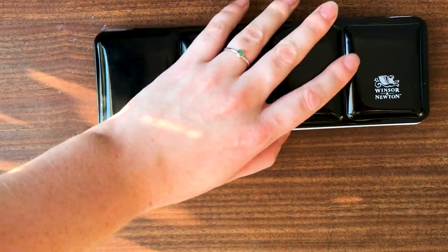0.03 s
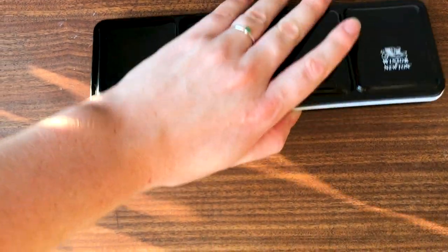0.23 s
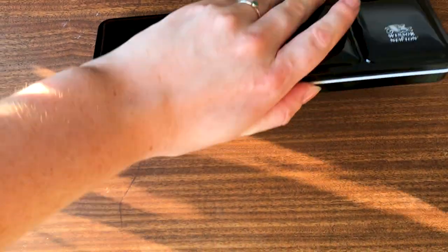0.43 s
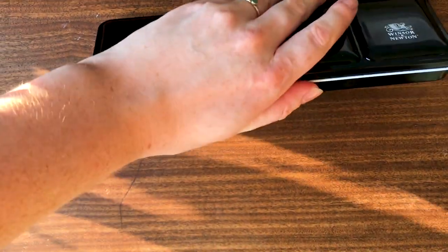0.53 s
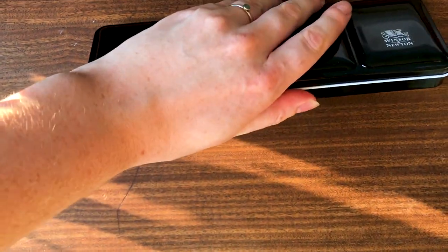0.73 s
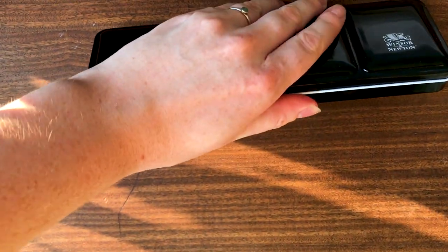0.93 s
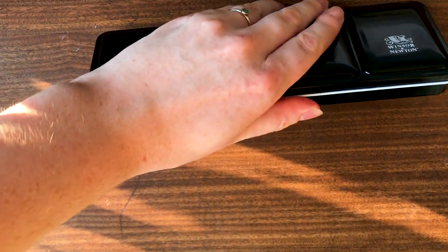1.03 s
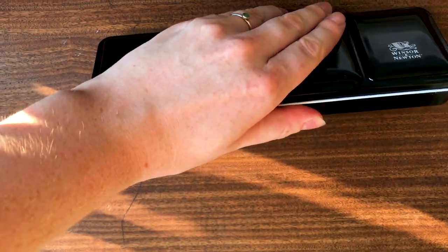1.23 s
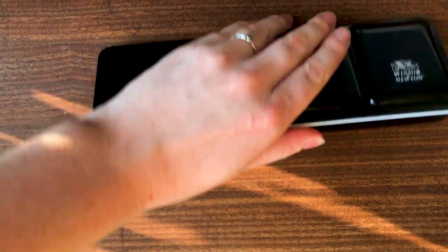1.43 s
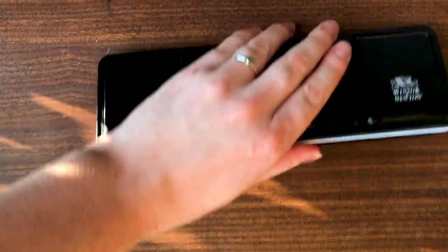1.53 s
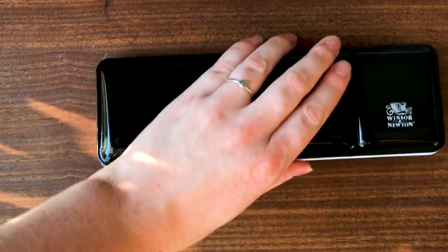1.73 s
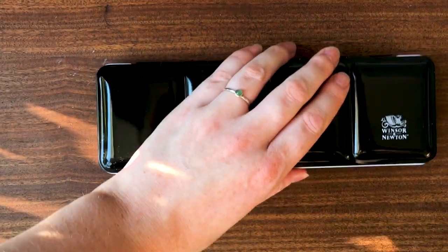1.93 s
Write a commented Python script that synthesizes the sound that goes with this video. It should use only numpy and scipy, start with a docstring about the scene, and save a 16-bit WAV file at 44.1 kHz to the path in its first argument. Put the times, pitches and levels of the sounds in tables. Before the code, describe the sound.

Close microphone in a small quiet room: a thin metal tin is knocked and dragged on wood, with dry clacks early, a short judder, near silence, one bright snap and soft fumbling knocks over low hum.

```python
"""A short scrape and light knocks come first: fingers work a flat metal tin open on a wooden table.
Blows excite the tin's damped modes and a noisy clatter; dense grit drags the same body over the wood,
and single slips make it judder. Random reflections give the quiet room around it.
Under it lie filtered-noise rumble and microphone hiss, a wavering hum and faint regular treble ticks."""
import sys
import numpy as np
from scipy import signal
from scipy.fft import rfft, irfft
from scipy.io import wavfile
from scipy.ndimage import uniform_filter1d

SR = 44100
rng = np.random.default_rng(int(sys.argv[2]) if len(sys.argv) > 2 else 0)


def gain_from_db(level_db):
    """Turn a decibel level (scalar or array-like) into a linear amplitude factor."""
    decades = np.asarray(level_db, float) / 20
    return 10 ** decades


def log_audio(samples):
    """Write samples as a 16-bit WAV file to the path given in sys.argv[1]."""
    # one column per channel
    frames = np.atleast_2d(samples).T
    # limit to full scale, then quantise
    limited = np.clip(frames, -1, 1)
    pcm = np.round(limited * 32767).astype(np.int16)
    wavfile.write(sys.argv[1], SR, pcm)


N = 88200

# modes of the hand-held tin and the table under it, before grip, contact place and decay limits:
# mode_hz [Hz], level_db [dB], t60_s [s]
TIN_MODES = [(329.2, 9.5, 0.033), (520, 6, 0.0076), (680, -5, 0.019), (736, -7, 0.069), (880, 4, 0.035),
             (1155, 17.5, 0.009), (1405, 5, 0.029), (1800, 10, 0.0058), (2166, 12.5, 0.012),
             (2594, 14, 0.0084), (2766, -3.5, 0.02), (3510, -3.5, 0.039), (3820, 3.5, 0.016),
             (4250, 6, 0.013), (4760, 1, 0.0098), (5330, -13, 0.01), (6610, 6.5, 0.0091), (7040, 0, 0.0098),
             (9280, -3, 0.0083)]


def read(points, hz):
    """Value of a spectrum table, straight on a log-frequency axis."""
    point_hz, value = np.transpose(points)
    return np.interp(np.log(hz + 1), np.log(point_hz + 1), value)


def evened(x):
    """Scales to rms 1."""
    return x / np.sqrt(np.mean(x ** 2) + 1e-20)


def add(mix, start_s, sound):
    """Mixes a sound in at its start time."""
    part = mix[round(start_s * SR):][:len(sound)]
    part += sound[:len(part)]


def random_places():
    """Each contact lands elsewhere on the tin, so each mode gets its own random drive."""
    return rng.standard_normal((len(TIN_MODES), 1))


def contact(best_hz, fall_db):
    """Causal (minimum-phase) colour of a contact: strongest near best_hz, falling off on both sides."""
    fall_below_db = 5  # dB per octave, as are knock_fall_db and top_fall_db
    knock_low_hz, knock_fall_db = 250, 24
    top_hz, top_fall_db = 9500, 11
    hz = np.maximum(abs(np.fft.fftfreq(2048, 1 / SR)), 20)
    octaves = np.log2(hz / best_hz)
    db = -np.where(octaves > 0, max(fall_db, 0), -fall_below_db) * octaves
    db = db - knock_fall_db * np.maximum(np.log2(knock_low_hz / hz), 0)
    db = db - top_fall_db * np.maximum(np.log2(hz / top_hz), 0)
    log_gain = np.maximum(db, -100) * np.log(10) / 20
    spectrum = np.exp(np.conj(signal.hilbert(log_gain)))
    return np.fft.ifft(spectrum).real[:1024]


def ring(clicks, best_hz, fall_db, place, grip):
    """The tin's answer to clicks: damped modes and fresh dense clatter, coloured by the contact."""
    focus_db, focus_octaves, focus_ring = 6, 0.11, 0.7  # boost, reach, share of longer ringing
    place_db = 2.2  # spread of mode levels from contact to contact
    clatter_db, clatter_t60_s = 13, 0.013  # dense small modes blur into a dying noise
    hz, db, t60 = np.transpose(TIN_MODES)[:, :, None]
    t = np.arange(4096) / SR

    # the grip bends the nearest mode towards best_hz and lets it ring most
    near = grip * np.exp(-(np.log2(hz / best_hz) / focus_octaves) ** 2)
    hz = hz + near * (best_hz - hz)
    db = db + focus_db * near
    t60 = np.clip(t60 * (1 + focus_ring * near), 0.01, 0.12)

    decay = gain_from_db(db + place_db * place - 60 * t / t60)
    modes = (decay * np.sin(2 * np.pi * hz * t)).sum(0)
    power = signal.fftconvolve(clicks ** 2, gain_from_db(clatter_db - 60 * t / clatter_t60_s) ** 2)
    clatter = np.sqrt(abs(power)) * rng.choice([-1., 1.], len(power))
    body = signal.fftconvolve(clicks, modes) + clatter
    return signal.fftconvolve(body, contact(best_hz, fall_db))


def slide():
    """Dense uneven grit clicks into the tin's body as it drags over the wood."""
    # movement of the drag: time_s [s], level_db [dB]
    drag = [(0, -31), (.06, -60.5), (.1, -49.5), (.165, -47), (.2, -65), (.4, -37), (.44, -76), (.47, -51),
            (0.512, -39.5), (.6, -45), (.625, -48), (.74, -52), (.8, -58), (1.2, -56.5), (1.4, -59.5),
            (1.52, -49), (1.65, -56.5), (1.721, -41.5), (1.768, -44), (1.83, -54), (1.95, -47.5), (2, -55)]
    best_hz, fall_db = 463, 6.5  # fall in dB per octave
    grit_per_s, grit_db = 2500, 2.5
    size = gain_from_db(grit_db * np.minimum(rng.exponential(1, N), 4))
    sign = rng.choice([-1., 1.], N)
    hit = rng.random(N) < grit_per_s / SR
    body = ring(size * sign * hit, best_hz, fall_db, 0, 0)[:N]
    time_s, level_db = np.transpose(drag)
    return evened(body) * gain_from_db(np.interp(np.arange(N) / SR, time_s, level_db))


def room(x):
    """Sparse reflections of random sign, each band dying at its own speed."""
    # how long the room rings: band_hz [Hz], t60_s [s]
    room_decay = [(250, 0.36), (1000, 0.3), (4000, 0.17), (9000, 0.1), (15000, 0.13)]
    room_db = -13.5
    taps = np.zeros(SR // 2)
    at = np.arange(200, len(taps) - 20, 20)  # one reflection in every 20 samples
    taps[at + rng.integers(0, 20, len(at))] = rng.choice([-1., 1.], len(at))
    hz, t, bands = signal.stft(taps, SR, nperseg=256)
    fade = gain_from_db(-60 * t / read(room_decay, hz)[:, None])
    tail = signal.istft(bands * fade, SR, nperseg=256)[1]
    return gain_from_db(room_db) * signal.fftconvolve(x, tail / np.linalg.norm(tail))[:N]


def rumble_and_hiss():
    """Low room rumble and microphone hiss: one noise shaped by a spectrum."""
    # colour of the noise, before its overall level is set: band_hz [Hz], density_db [dB per Hz]
    air_colour = [(20, -51), (30, -61), (42, 3), (53, 7), (75, 2), (120, -2.5), (170, -5), (300, -15),
                  (700, -19), (1500, -24.5), (3000, -26), (6500, -28.5), (7700, -33.5), (9000, -29.5),
                  (10500, -36), (13000, -29), (16000, -35)]
    air_db = -44.5  # rms
    gain = gain_from_db(read(air_colour, np.fft.rfftfreq(N, 1 / SR)))
    air = irfft(rfft(rng.standard_normal(N)) * gain, N)
    return gain_from_db(air_db) * evened(air)


def fuzzy_tone(x, hz, width_hz):
    """Narrows a sound to a bell-shaped band around hz, at rms 1."""
    f = np.fft.rfftfreq(N, 1 / SR)
    bell = np.exp(-((f - hz) / width_hz) ** 2)
    return evened(irfft(rfft(x) * bell, N))


def hum():
    """A steady sine blurred by narrow noise, wavering along a level curve."""
    # the waver: time_s [s], level_db [dB]
    waver = [(0.0, -41.5), (0.14, -53.5), (0.2, -39), (0.25, -69), (0.32, -30.5), (0.47, -58),
             (0.61, -36.5), (0.76, -55.5), (1.55, -69), (1.68, -43), (1.82, -64), (2.0, -49.5)]
    hum_hz, width_hz = 118, 10
    t = np.arange(N) / SR
    sine = np.sin(2 * np.pi * hum_hz * t)
    blur = 0.041 * rng.standard_normal(N) * np.sqrt(SR / width_hz)
    time_s, level_db = np.transpose(waver)
    return gain_from_db(np.interp(t, time_s, level_db)) * fuzzy_tone(sine + blur, hum_hz, width_hz)


def blow(level_db, best_hz, fall_db, rattle_s):
    """A contact and brief rattle; the walls get weaker ringing plus a short click of its colour."""
    rattle_per_s, first_click = 2000, 1.3
    loose_s, ring_in_room = 0.016, 0.6
    t = np.arange(4096) / SR
    fade = np.exp(-(t / np.clip(rattle_s, 0.0005, 0.06)) ** 3)
    hit = rng.random(len(t)) < rattle_per_s / SR
    clicks = rng.standard_normal(len(t)) * hit * fade
    clicks[0] = first_click
    grip = np.exp(-(rattle_s / loose_s) ** 2)  # a long loose rattle favours no mode
    sound = ring(clicks, best_hz, fall_db, random_places(), grip)
    loudest = np.sqrt(uniform_filter1d(sound ** 2, size=220).max())  # rms of the loudest 5 ms
    sound = gain_from_db(level_db) * 0.39 * sound / loudest

    colour = contact(best_hz, fall_db)
    to_walls = ring_in_room * sound
    add(to_walls, 0, colour * np.linalg.norm(sound) / np.linalg.norm(colour))
    return sound, to_walls


def ticks():
    """Faint regular ticks: a treble noise band that restarts and dies away at an even pace."""
    first_s, every_s = 0.0095, 0.1024
    tick_hz, width_hz = 13400, 3100
    tick_db, fade_s = -51, 0.0018  # level at the onset, time constant
    since = (np.arange(N) / SR - first_s) % every_s
    noise = fuzzy_tone(rng.standard_normal(N), tick_hz, width_hz)
    return gain_from_db(tick_db) * noise * np.exp(-since / fade_s)


def judder():
    """The base catches and slips at a nearly even pace, pressed down so that it barely rings."""
    # single slips: start_s [s], peak_db [dB]
    slips = [(.5445, -24), (0.5576, -30), (.572, -35), (.582, -37), (.595, -28), (0.609, -32.5),
             (.640, -41), (0.6508, -29.5), (0.663, -32), (.677, -28.5), (.691, -37)]
    best_hz, fall_db = 850, 19  # fall in dB per octave
    grip, press_t60_s = 0.71, 0.024  # pressing adds this decay to the tin's own
    out = np.zeros(N)
    for start_s, peak_db in slips:
        slip = ring(np.ones(1), best_hz, fall_db, random_places(), grip)
        slip = slip * gain_from_db(-60 * np.arange(len(slip)) / SR / press_t60_s)
        add(out, start_s, gain_from_db(peak_db) * slip / abs(slip).max())
    return out


def scene():
    """The tin, its reflections from the room and the background."""
    # blows on the tin: start_s [s], level_db [dB, before blow() scales it by 0.39],
    # best_hz [Hz, driven most], fall_db [dB per octave above it], rattle_s [s, limited in blow()]
    blows = [(.005, -25, 1000, 4, 0.0024), (0.02, -30.5, 830, 0.5, 0.0011), (.1225, -30.5, 4600, 2, 0.0063),
             (.123, -28.5, 1040, 29, 0.0033), (0.138, -22.5, 2456, 10.5, 0.0032),
             (.143, -24, 655, 19, 0.0031), (0.153, -24, 645, 12, 0.0063), (.2411, -18.5, 2700, 2, 0.0028),
             (0.2413, -2.5, 1396, 13, 0.0045), (0.2437, -6.5, 349, 5.5, 0.0038),
             (.291, -14.5, 370, 7.5, 0.007), (0.3073, -16.5, 1210, 7, 0.0045),
             (0.31, -3.5, 680, 8.5, 0.0059), (.362, -11, 2600, 8, 0.0081),
             (0.363, -15.5, 1160, 10.5, 0.0061), (0.364, -17, 4450, 6, 0.0065), (0.41, -25, 1291, 6, 0.013),
             (0.49, -31, 1760, 16, 0.0082), (0.709, -19.5, 680, 4.5, 0.0028), (.714, -28, 372, 14, 0.01),
             (0.931, -44.5, 656, 24, 0.0072), (1.2287, -17.5, 760, 10, 0.0012),
             (1.2346, -11, 762, 4.5, 0.0042), (1.2408, -5, 2970, 0, 0.0025), (1.2434, -4, 327, 2, 0.0063),
             (1.248, -19, 734, 5.5, 0.024), (1.273, -31, 3680, 3, 0.068), (1.445, -22, 1230, 7, 0.0015),
             (1.511, -32, 332, 3, 0.0047), (1.528, -23, 1264, 4.5, 0.015), (1.553, -31.5, 1840, 11, 0.0054),
             (1.605, -25, 4770, 0, 0.004), (1.606, -23, 1205, 15, 0.0026),
             (1.701, -26.5, 1170, 2.5, 0.0026), (1.734, -26, 1350, 9, 0.007),
             (1.738, -19, 327, 10.5, 0.00089), (1.797, -37, 332, 9, 0.0088), (1.893, -35, 329, 19, 0.0064),
             (1.914, -24.5, 1235, 6.5, 0.007), (1.935, -33.5, 880, 21, 0.02)]
    tin = slide() + judder()
    walls = tin.copy()
    for start_s, *settings in blows:
        sound, to_walls = blow(*settings)
        add(tin, start_s, sound)
        add(walls, start_s, to_walls)
    background = rumble_and_hiss() + hum() + ticks()
    return (tin + room(walls) + background)[None]


def top_cut(x):
    """Nothing passes above the cut-off."""
    return signal.sosfilt(signal.butter(12, 16670, fs=SR, output="sos"), x)


def record(dry):
    """The phone's band limit: a steep low-pass takes off the extreme treble."""
    edge = signal.firwin(511, 15850, window=("kaiser", 8), fs=SR)
    mix = signal.oaconvolve(dry, edge[None], "same")
    return top_cut(mix)


dry = scene()
out = record(dry)
log_audio(out)
```